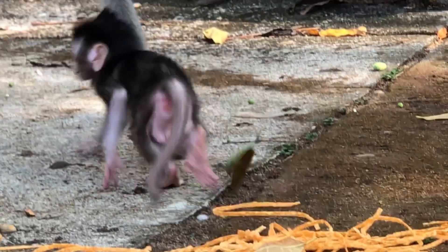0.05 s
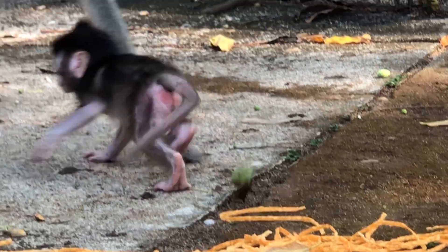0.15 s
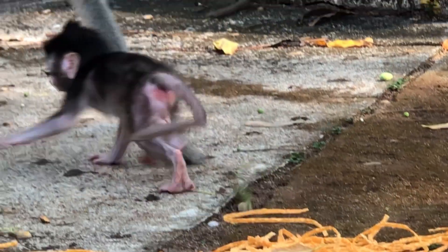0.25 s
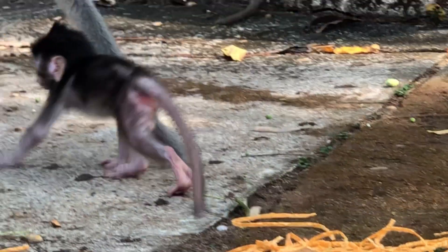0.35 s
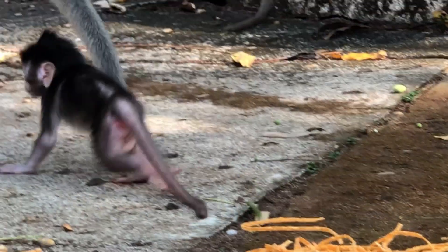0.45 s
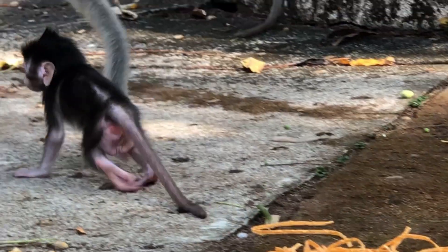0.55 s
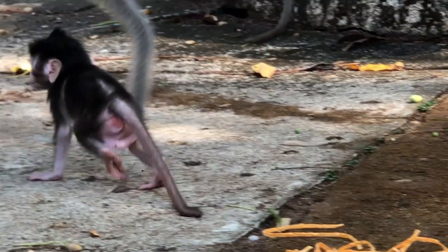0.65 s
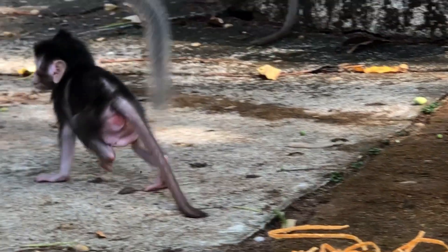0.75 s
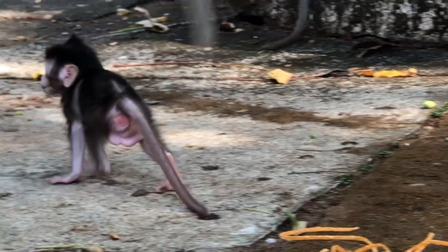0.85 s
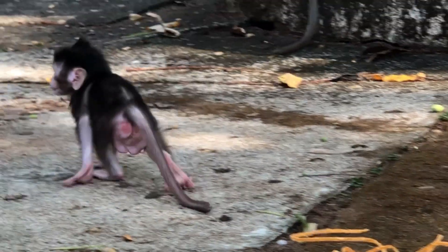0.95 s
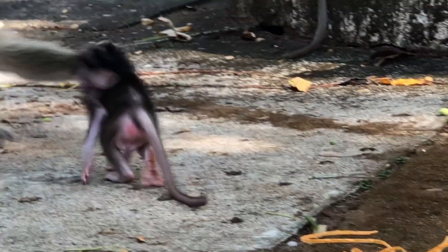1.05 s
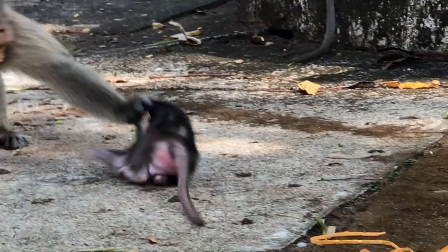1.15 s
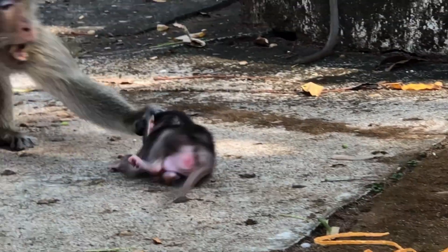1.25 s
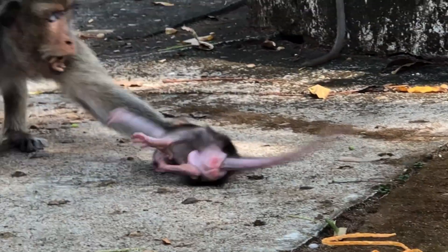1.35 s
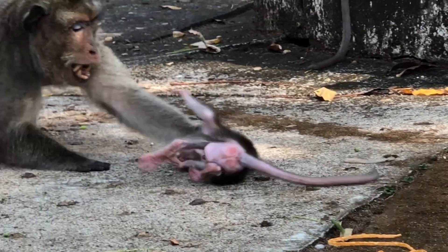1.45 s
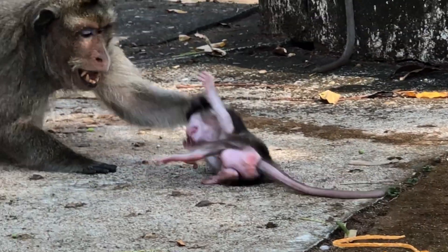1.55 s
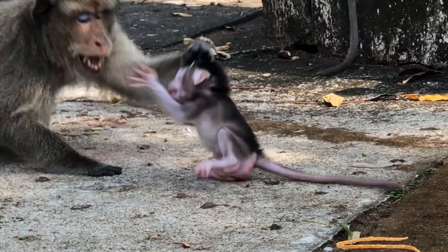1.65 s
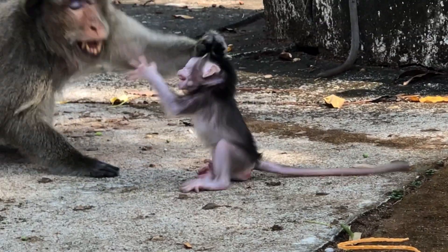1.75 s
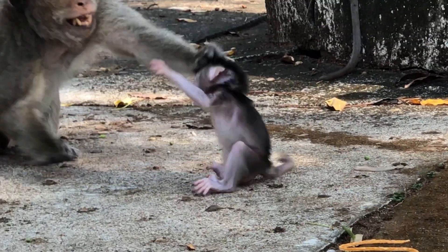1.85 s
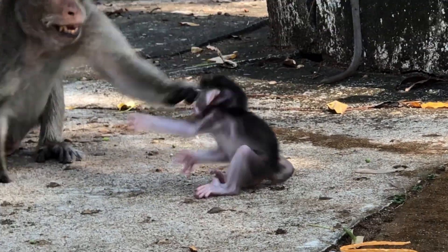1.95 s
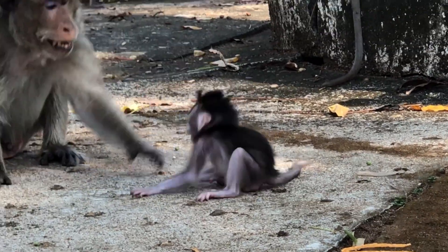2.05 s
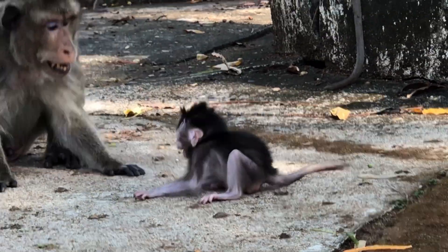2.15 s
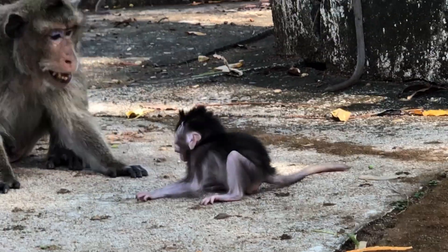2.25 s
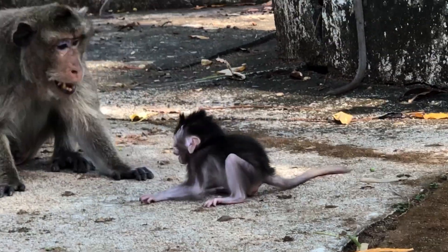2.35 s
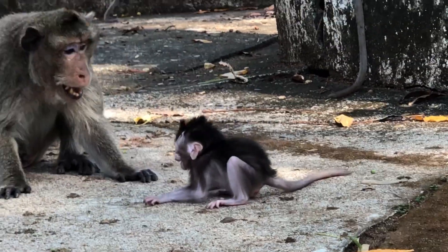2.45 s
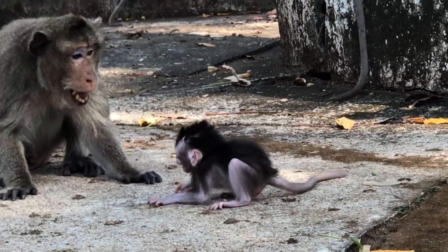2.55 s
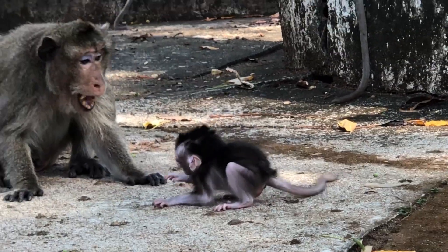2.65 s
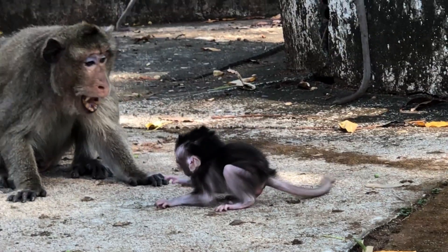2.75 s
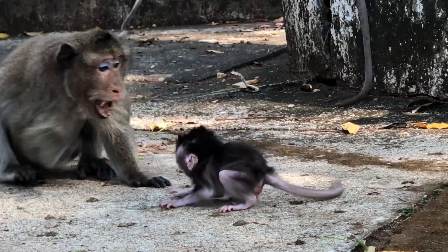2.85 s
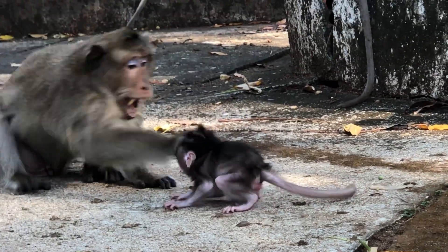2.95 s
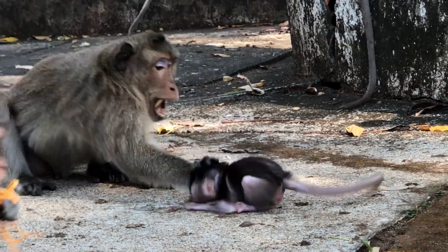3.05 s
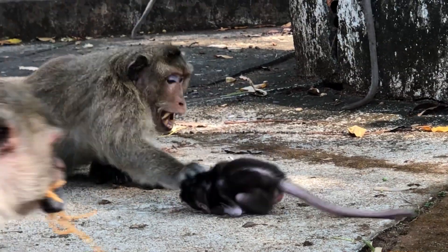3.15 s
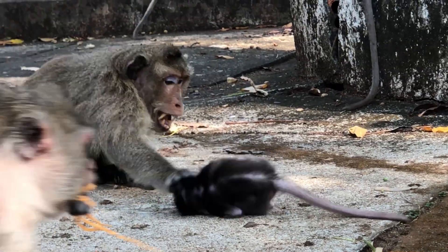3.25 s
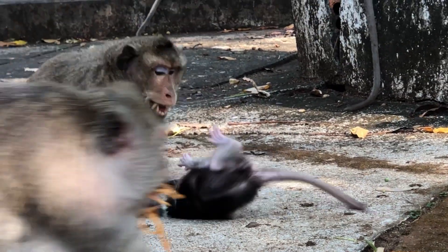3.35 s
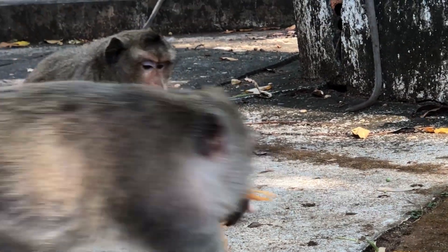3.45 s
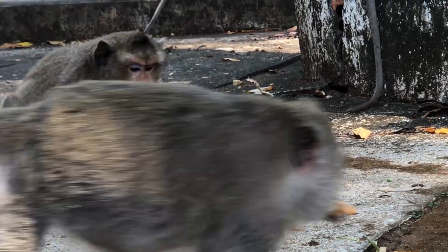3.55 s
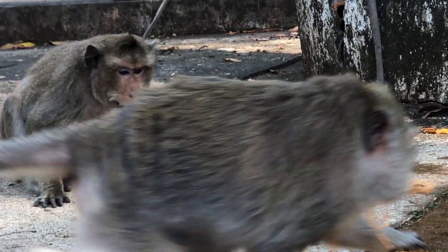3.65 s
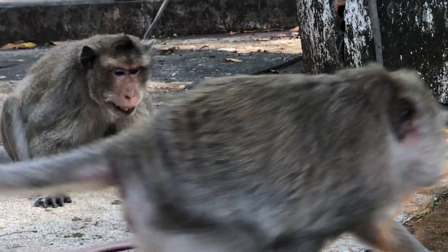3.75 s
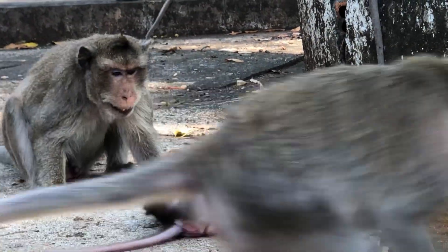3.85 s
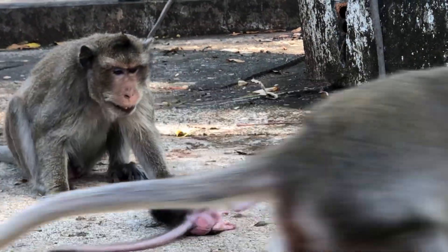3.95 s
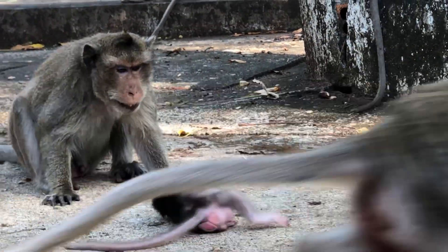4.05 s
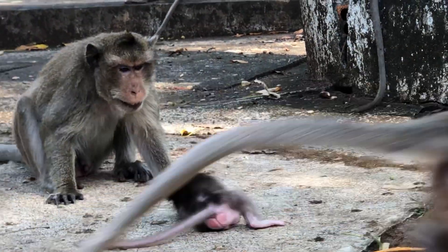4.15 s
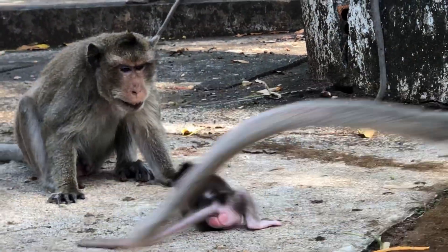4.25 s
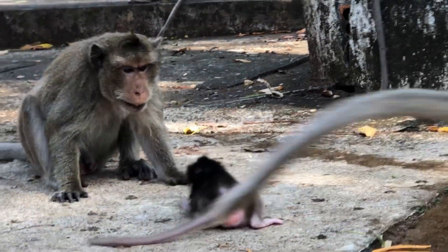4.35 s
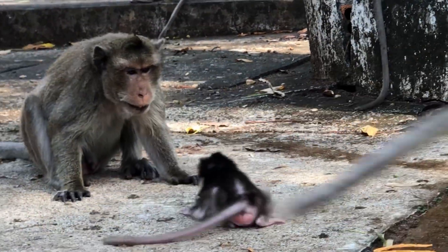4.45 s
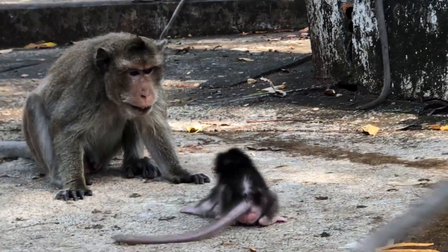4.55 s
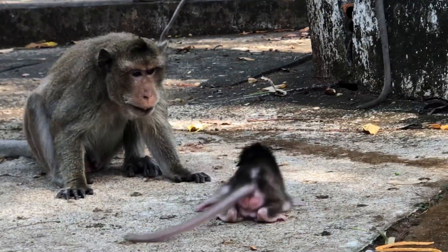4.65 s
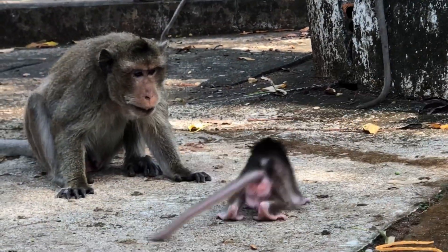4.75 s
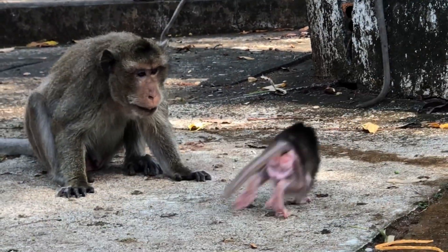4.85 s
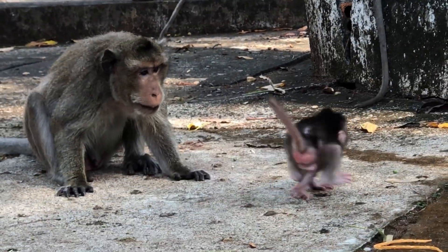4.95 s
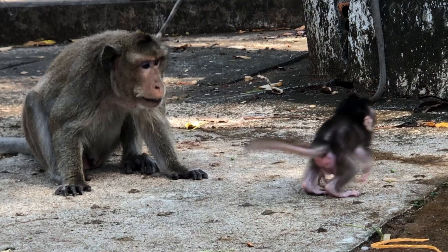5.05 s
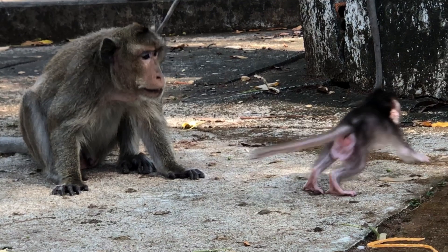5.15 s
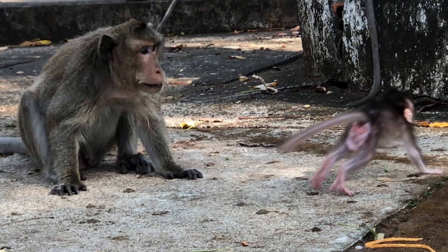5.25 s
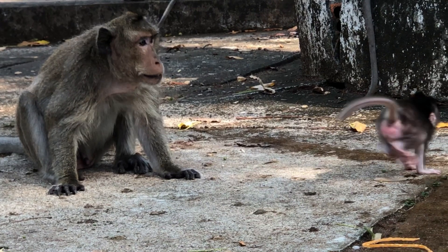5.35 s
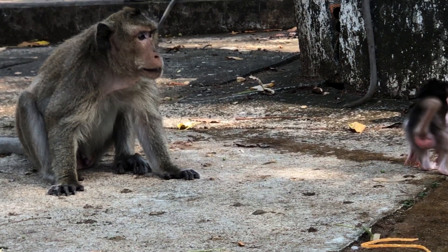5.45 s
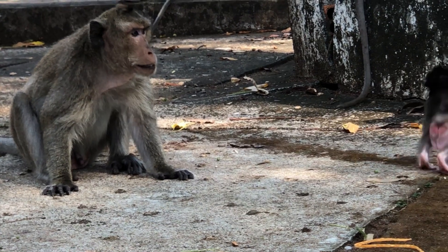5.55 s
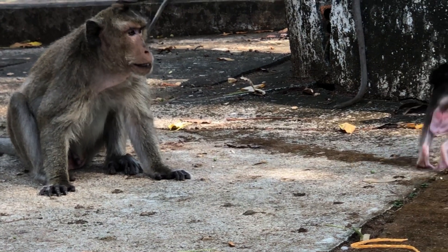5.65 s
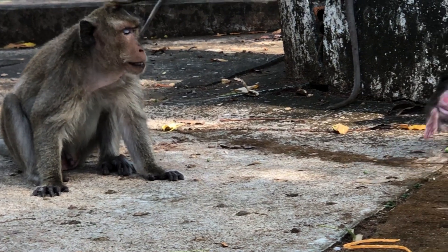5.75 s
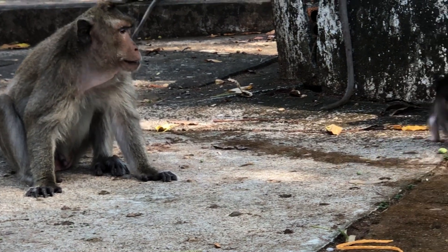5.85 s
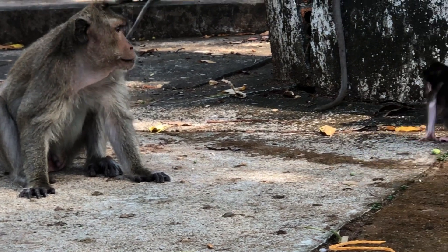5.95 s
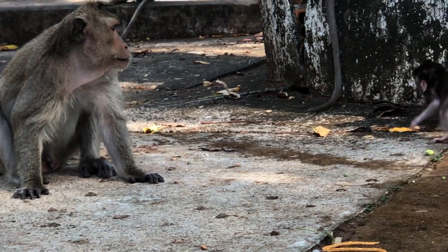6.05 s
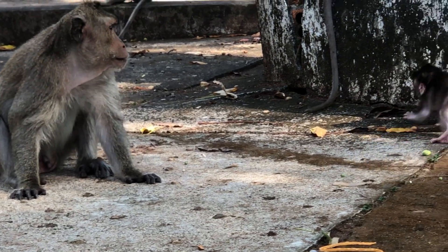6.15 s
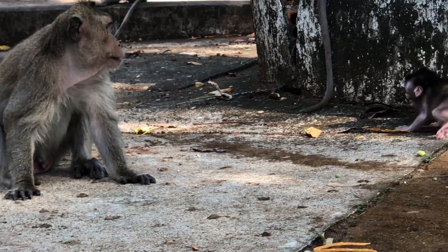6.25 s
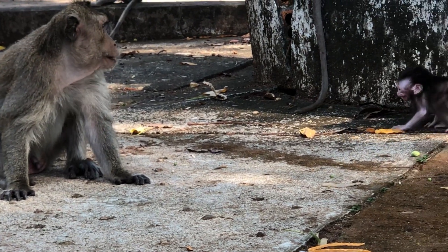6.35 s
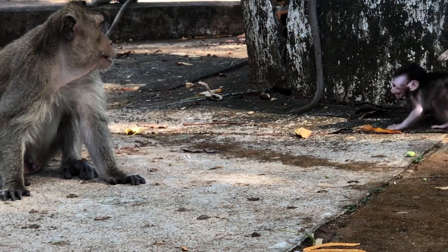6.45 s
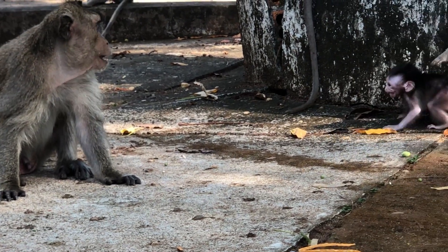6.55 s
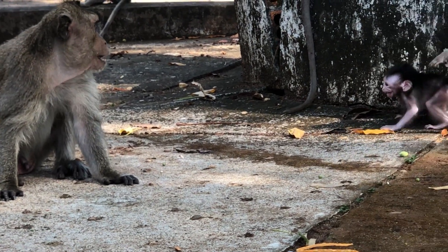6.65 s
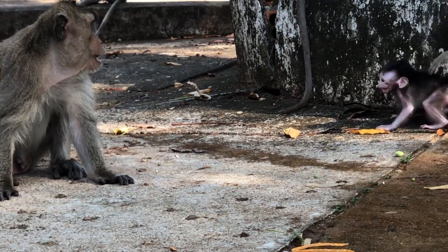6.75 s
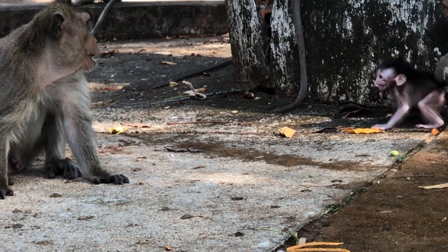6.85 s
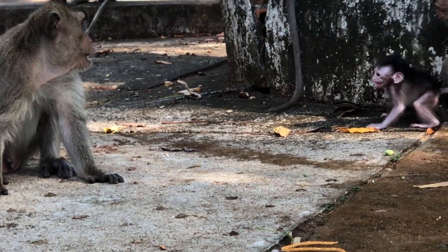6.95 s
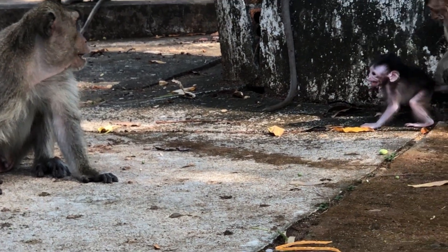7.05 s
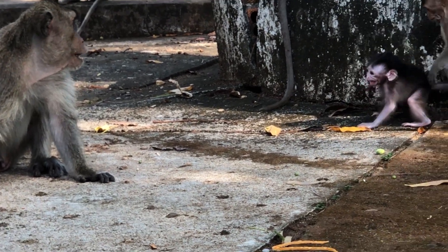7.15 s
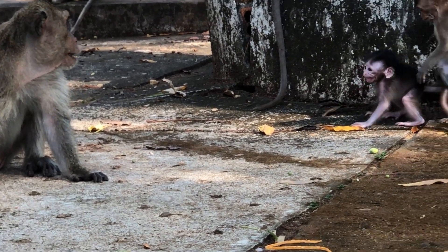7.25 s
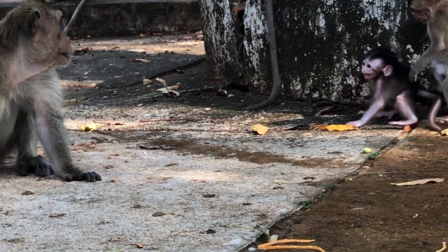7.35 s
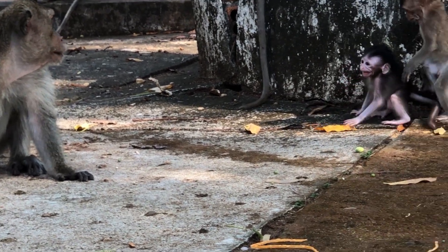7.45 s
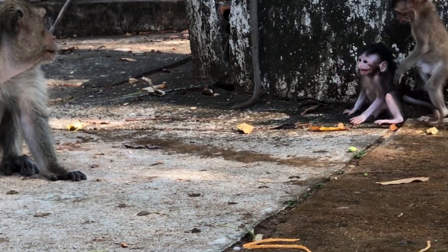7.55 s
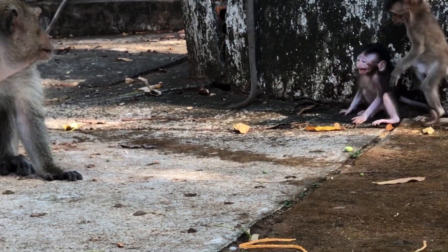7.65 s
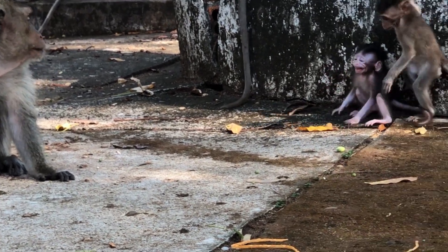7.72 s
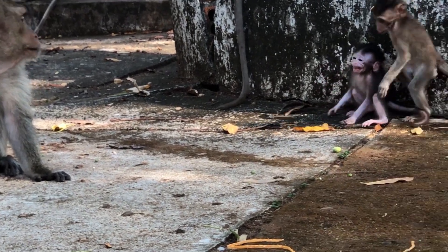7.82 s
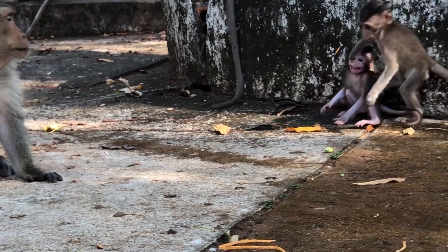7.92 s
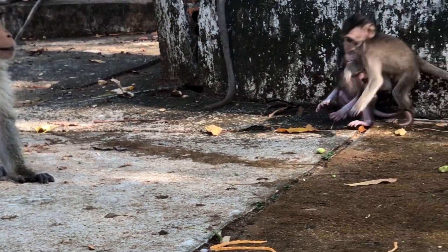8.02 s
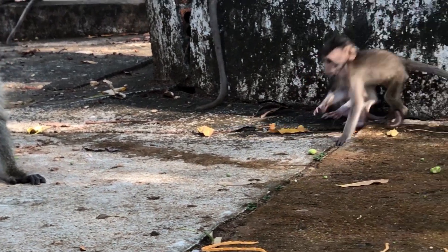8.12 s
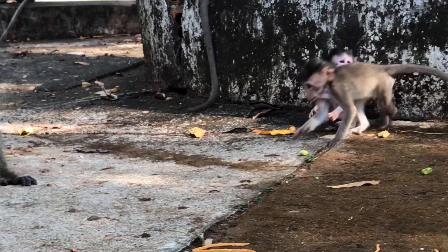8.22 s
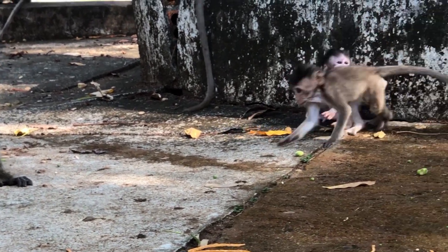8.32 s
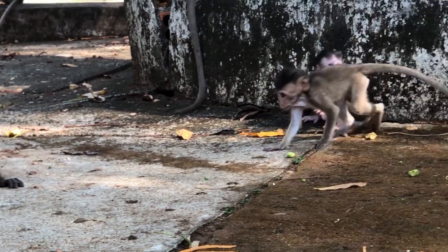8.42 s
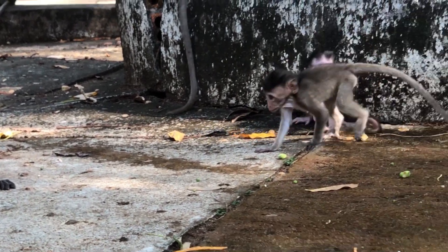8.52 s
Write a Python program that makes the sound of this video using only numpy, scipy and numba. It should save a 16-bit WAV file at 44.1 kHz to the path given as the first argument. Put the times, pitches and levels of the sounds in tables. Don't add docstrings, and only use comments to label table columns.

```python
import sys
import numpy as np
from scipy import signal
from scipy.fft import rfft, irfft, next_fast_len
from scipy.io import wavfile
from scipy.ndimage import uniform_filter1d
from numba import njit

SR = 44100
rng = np.random.default_rng(int(sys.argv[2]) if len(sys.argv) > 2 else 0)


def pcm_store(signal):
    levels = np.round(np.clip(np.atleast_2d(signal), -1, 1) * 32767)
    wavfile.write(sys.argv[1], SR, levels.astype(np.int16).T)


def amplitude_ratio(level_db):
    exponent = np.asarray(level_db, float) / 20
    return 10 ** exponent


N = 378378

# start, peak and end in seconds, peak level in dB, swell up to the peak in dB.
BREATHS = [(1.208, 1.245, 1.32, -54, 7), (1.259, 1.339, 1.4915, -13.5, 11), (1.773, 1.897, 1.979, -20.5, 5),
           (2.58, 2.628, 2.65, -36.5, 20), (3.107, 3.175, 3.374, -19, 6), (3.339, 3.413, 3.52, -25.5, 4),
           (3.832, 3.888, 4.032, -24.5, 9.5), (4.604, 4.75, 4.845, -23.5, 12.5),
           (5.182, 5.245, 5.274, -30, 11), (5.269, 5.325, 5.375, -34, 6), (5.622, 5.737, 5.8, -26.5, 6),
           (6.219, 6.373, 6.435, -27, 13.5), (7.755, 7.812, 7.928, -32.5, 20),
           (8.479, 8.564, 8.7, -25.5, 13)]
# sag after the peak in dB, resonance at the start and at the end in Hz,
# brightness in dB, chest in dB.
MOUTHS = [(1.5, 4300, 4400, -7.5, 25), (5.5, 5300, 3950, -1.5, 7), (3.4, 4330, 5560, 5, -8),
          (-7, 3900, 3890, 10.5, 7), (12, 4570, 7870, 3.5, -3), (4, 6300, 4500, -3.5, -8),
          (4, 5250, 3600, -15, -1), (11.5, 4200, 5740, 3, -0.5), (-16, 5140, 5700, 5, -18.5),
          (-0.5, 4300, 5900, -1, -12), (8, 5700, 5740, 5, -1.5), (3, 6750, 4800, 8, 0),
          (-2.3, 4150, 4700, 2.5, -8), (7, 4350, 5800, -5.5, -21)]
SWITCH_S = 0.009


def unit(x):
    return x / np.sqrt(np.mean(x ** 2))


def curve(table, hz):
    f, db = np.transpose(table)
    return np.interp(np.log(np.maximum(hz, 1)), np.log(f), db)


def colour(x, gain):
    size = next_fast_len(len(x))
    hz = np.arange(size // 2 + 1) * SR / size
    return irfft(rfft(x, size) * gain(hz), size)[:len(x)]


def slew(x, seconds):
    return uniform_filter1d(1. * x, size=max(int(seconds * SR), 1))


def walk(rate_hz):
    hold = max(int(SR / rate_hz), 1)
    steps = np.repeat(rng.standard_normal(N // hold + 1), hold)
    return unit(uniform_filter1d(uniform_filter1d(steps, hold), hold)[:N])


@njit
def moving_resonance(x, hz, width_hz):
    y, band, low = np.empty(len(x)), 0., 0.
    for i in range(len(x)):
        g, k = np.tan(np.pi * hz[i] / SR), width_hz / hz[i]
        v = (band + g * (x[i] - low)) / (1 + g * (g + k))
        band = 2 * v - band
        low += 2 * g * v
        y[i] = k * v
    return y


def infant():
    # frequency in Hz, gain in dB.
    throat = [(700, -36), (1100, -25.5), (1600, -20), (2000, -5.5), (2500, -3), (3100, -5), (5000, -0.5),
              (6500, -7.5), (8200, -11), (9200, -12.5), (10200, -18.5), (11000, -26.5)]
    t = np.arange(N) / SR
    start, _, end, peak_db, _ = np.transpose(BREATHS)
    i = np.clip(np.searchsorted(start, t) - 1, 0, None)
    _, from_hz, to_hz, bright_db, chest_db = np.array(MOUTHS)[i].T
    progress = np.clip((t - start[i]) / (end - start)[i], 0, 1)
    mouth_hz = from_hz + (to_hz - from_hz) * progress
    push = effort(t)
    below_peak_db = (20 * np.log10(push + 1e-6) - peak_db[i]).clip(-25, 0)
    bright_db = bright_db + 0.13 * below_peak_db

    raw = colour(folds(t), lambda f: amplitude_ratio(curve(throat, f)))
    mouth = moving_resonance(raw, slew(mouth_hz, SWITCH_S), 1500.0)
    high = colour(raw, lambda f: 1 / (1 + (6800 / (f + 1)) ** 8))
    chest = colour(raw, lambda f: 1 / (1 + (f / 2700) ** 8) / (1 + (1350 / (f + 1)) ** 8))
    voice = raw + amplitude_ratio(8.5) * mouth
    voice += (amplitude_ratio(slew(bright_db, SWITCH_S)) - 1) * high
    voice += (amplitude_ratio(slew(chest_db, SWITCH_S)) - 1) * chest
    voice /= np.sqrt(uniform_filter1d(voice ** 2, size=280))
    return voice * push


def effort(t):
    attack_s, release_s, release_power = 0.022, 0.037, 1.18
    out = 0
    for (start, peak, end, db, swell_db), (sag_db, *_) in zip(BREATHS, MOUTHS):
        opening = np.clip((t - start) / attack_s, 0, 1) ** 2
        closing = np.clip((end - t) / release_s, 0, 1) ** release_power
        level_db = np.interp(t, (start, peak, end), (db - swell_db, db, db - sag_db))
        out = np.maximum(out, opening * closing * amplitude_ratio(level_db))
    return out


def folds(t):
    overtone_db, under_db = -22.0, -18.0
    hz, n, depth, chaos = states(t)
    hz = hz * (1 + .025 * chaos ** 2 * walk(300) + .004 * walk(60))
    jitter = .85 * np.sqrt(chaos) * walk(2500)
    phase = (2 * np.pi * np.cumsum(hz) / SR + jitter) / n
    out = .6 * (.025 + chaos) * rng.standard_normal(N) * (1 + np.cos(phase))
    torn = np.clip(1.25 * chaos - .12, 0, 1)
    second_half = sum((t > (b[0] + b[2]) / 2) & (t < b[2]) for b in BREATHS)
    faint_db = -14 * slew(second_half, .04)
    for k in range(1, 14):
        pure_db = overtone_db * np.maximum(k / n - 2, 0) + faint_db * (k > n)
        share = np.where(k % n == 0, amplitude_ratio((1 - depth) * pure_db), depth)
        share = share * (k * hz / n < 12000)
        weakened = np.where(hz < 4700, abs(k * hz / n - 2000) < 520, k == 1)
        share *= amplitude_ratio(under_db * ((n > 3) + .5 * (n == 2)) * weakened)
        size = np.sqrt(1 - torn) + np.sqrt(torn) * walk(680)
        line = np.cos(k * phase + k * k * (k % n))
        out += share * size * amplitude_ratio(2.5 * walk(60)) * line
    return out


def states(t):
    # start in seconds, pitch from and to in Hz.
    whistles = [(1.224, 2854, 2947), (1.262, 3492, 4397), (1.484, 4402, 3585), (1.774, 4175, 4546),
                (1.957, 4638, 4008), (2.581, 3580, 3860), (2.605, 3880, 3925), (2.638, 3900, 3600),
                (3.836, 4150, 4114), (4.003, 4203, 4280), (4.6, 4075, 4255), (4.812, 4480, 4390),
                (5.188, 4350, 4270), (5.279, 4300, 4470), (5.347, 4420, 4350), (5.79, 4413, 4300),
                (6.218, 4240, 4400), (6.42, 4320, 4340), (7.758, 3750, 4300), (7.809, 4254, 4170),
                (7.86, 4135, 4120), (7.893, 4173, 4015), (8.477, 3890, 4260)]
    # start in seconds, pitch from and to in Hz, cycles per beat, depth 0-1.
    locked = [(1.281, 4572, 4690, 3, 0.8), (1.401, 5094, 5065, 4, 0.35), (1.435, 5040, 4740, 4, 0.32),
              (3.847, 4050, 4210, 4, 0.33), (3.864, 4190, 4175, 4, 0.74), (5.197, 4265, 4330, 4, 0.54),
              (6.236, 4280, 4300, 4, 0.85), (6.262, 4327, 4226, 4, 0.83), (6.378, 4267, 4136, 4, 0.72),
              (8.517, 4300, 4587, 4, 1)]
    # start in seconds, pitch from and to in Hz, cycles per beat, depth 0-1.
    hoarse = [(1.812, 4810, 4976, 3, 1), (3.311, 3995, 3880, 2, .95), (3.372, 3860, 3100, 2, 0.55),
              (3.94, 4134, 4006, 4, 0.47), (4.622, 4285, 4343, 4, 0.5), (5.256, 4264, 4190, 4, 0.4),
              (5.634, 4464, 4387, 4, 0.75), (5.758, 4148, 4030, 4, 0.6), (8.505, 4326, 4294, 4, .8)]
    # start in seconds, pitch in Hz, cycles per beat, depth 0-1, chaos 0-1.
    torn = [(1.302, 4580, 3, 0.52, 1.1), (1.344, 4150, 3, 0.25, 0.6), (1.357, 4336, 3, 0.2, 0.98),
            (1.474, 4710, 4, 0.66, 0.77), (1.79, 4855, 3, 0.3, 0.44), (1.833, 5330, 6, 1, 0.61),
            (1.89, 5443, 6, 0.29, 0.61), (1.94, 4896, 4, 0.6, 0.36), (3.108, 4150, 3, .4, .75),
            (3.135, 4600, 5, 1, 0.99), (3.39, 4494, 3, .8, .42), (3.44, 4256, 4, 0.89, .6),
            (3.889, 4234, 4, 0.9, 0.47), (3.984, 4083, 4, 0.51, 0.41), (4.645, 4360, 4, 1, .45),
            (4.735, 4318, 5, 0.7, 0.57), (4.775, 4246, 4, 0.99, .55), (5.223, 4370, 4, 0.98, 0.59),
            (5.31, 4473, 4, 0.57, 0.53), (5.657, 4510, 4, .97, .7), (5.705, 4320, 4, 0.96, .72),
            (6.403, 4073, 4, 1, .4), (8.53, 4530, 4, .97, .7)]
    whistle_depth, whistle_chaos, locked_chaos, hoarse_chaos = .03, .015, 0.013, .2
    torn_sag_hz_per_s = 2500

    rows = [(s, a, b, 1, whistle_depth, whistle_chaos) for s, a, b in whistles]
    rows += [(*row, locked_chaos) for row in locked]
    rows += [(*row, hoarse_chaos) for row in hoarse]
    rows += [(s, a, 0, n, d, c) for s, a, n, d, c in torn]
    start, from_hz, to_hz, cycles, depth, chaos = np.transpose(sorted(rows))
    stops = np.sort(np.concatenate([start, np.transpose(BREATHS)[2]]))
    length = stops[np.searchsorted(stops, start, side="right")] - start
    rise = np.where(to_hz > 0, to_hz - from_hz, -torn_sag_hz_per_s * length)
    i = np.clip(np.searchsorted(start, t) - 1, 0, None)
    hz = from_hz[i] + rise[i] * np.clip((t - start[i]) / length[i], 0, 1)
    depth = np.clip(slew(depth[i], SWITCH_S), 0, 1)
    chaos = np.clip(slew(chaos[i], SWITCH_S), 0, 1)
    return hz, np.round(cycles)[i], depth, chaos


def echoes(x):
    early_db, early_t60 = -17, 0.56
    late_db, late_t60 = -22, 1.22
    t = np.arange(SR * 3 // 2) / SR
    early = unit(rng.standard_normal(len(t)) * amplitude_ratio(-60 * t / early_t60) * (t > .004))

    def wall(f):
        warm = (amplitude_ratio(4) - 1 + 1) * np.exp(-np.log2((f + 1) / 3500) ** 2 / 0.031)
        return (1 + warm) / (1 + (f / 8000) ** 2)

    late = colour(rng.standard_normal(len(t)), wall)
    late = unit(late * amplitude_ratio(-60 * t / late_t60) * np.minimum(t / 0.012, 1))
    response = (amplitude_ratio(early_db) * early + amplitude_ratio(late_db) * late) / np.sqrt(len(t))
    return signal.fftconvolve(x, response)[:N]


def small_sounds():
    # start in seconds, peak in dB, pitch in Hz, spread in octaves.
    ticks = [(1.054, -39, 5470, 0.46), (1.258, -52, 7000, 0.42), (2.9712, -34.5, 5470, 0.59),
             (3.0294, -50.5, 7740, 0.8), (4.3794, -46.5, 5460, 0.72), (4.4193, -50, 5350, 0.71),
             (4.4415, -37.5, 5700, 0.51), (4.89, -36.5, 5770, 0.6), (5.0394, -38.5, 5276, 0.64),
             (7.0078, -45, 5365, 0.68), (7.1494, -53, 5470, 0.62), (7.9595, -52, 6690, 0.53)]
    # start in seconds, peak in dB, pitch in Hz, spread in octaves.
    thuds = [(1.057, -32, 2490, 0.54), (2.974, -35, 1570, 1.1), (4.021, -38, 1654, 0.9),
             (4.344, -34, 1017, 1.23), (4.52, -31.5, 1500, 1.5), (4.893, -38.5, 906, 0.84),
             (6.084, -40, 784.6, 0.99), (6.182, -37, 1544, 0.96), (6.869, -39, 1940, 0.93),
             (7.749, -43, 996, 0.81)]
    # start in seconds, length in seconds, pitch in Hz, level in dB.
    coos = [
        (0.336, 0.39, 332.6, -56.5),
        (0.35, 0.39, 4520, -68),
        (8.301, 0.31, 382, -60),
    ]
    lead = 128
    out, t = np.zeros(N), np.arange(1024) / SR
    decay = np.exp(-t / .0015) + .4 * np.exp(-t / 0.011)
    for start, db, hz, spread in [*ticks, *thuds]:
        burst = np.roll(rng.standard_normal(1024) * decay, lead)
        tick = colour(burst, lambda f: np.exp(-(np.log2((f + 1) / hz) / spread) ** 2))
        tick *= signal.windows.tukey(1024, .2)
        i = int(start * SR) - lead
        out[i:i + 1024] += tick / np.abs(tick).max() * amplitude_ratio(db - 3)
    t = np.arange(N) / SR
    for start, length, hz, db in coos:
        swell = np.sin(np.pi * np.clip((t - start) / length, 0, 1))
        phase = 2 * np.pi * np.cumsum(hz * (1 + 0.008 * walk(16))) / SR
        out += amplitude_ratio(db) * swell * np.sin(phase)
    return out


def insects():
    # pitch in Hz, width in Hz, level in dB.
    choruses = [
        (3100, 410, -63.5),
        (3750, 590, -63),
        (4740, 440, -67),
        (940, 100, -74),
    ]
    out = 0
    for hz, width, db in choruses:
        hiss = colour(rng.standard_normal(N), lambda f: np.exp(-((f - hz) / width) ** 2))
        out = out + unit(hiss) * amplitude_ratio(db + .8 * walk(1.2))
    return out


def yard():
    # frequency in Hz, level in dB per Hz.
    spectrum = [(12, -44), (20, 2), (75, 0), (130, -6), (233, -16.5), (337, -17.5), (405, -20.5),
                (587, -22.5), (919, -24), (1200, -28), (1600, -25.5), (2030, -29.5), (4480, -29),
                (9890, -54), (11000, -76.5), (14300, -101), (22000, -120)]
    out, swell = 0, walk(0.24)
    for hz in 22 * 2 ** np.arange(0, 9.1, .5):
        def band_gain(f):
            octaves = np.clip(np.log2((f + 1) / hz), -.5, .5)
            return amplitude_ratio(curve(spectrum, f)) * np.cos(np.pi * octaves)

        band = colour(rng.standard_normal(N), band_gain)
        out = out + band * amplitude_ratio(0.2 * swell + 0.37 * walk(1.422) + 0.89 * walk(15))
    return unit(out) * amplitude_ratio(-45)


def engine():
    # time in seconds, level in dB.
    idle = [(0, -50), (.9, -48.5), (1.6, -44), (2.2, -44), (2.9, -44.5), (3.599, -43), (4, -55), (5, -60.5),
            (8.58, -68)]
    s, db = np.transpose(idle)
    hz = 82 * (1 + 0.0289 * walk(1.5) + 0.0393 * walk(25))
    phase = 2 * np.pi * np.cumsum(hz) / SR
    hum = (np.sin(phase) + 0.19 * np.sin(2 * phase)) * amplitude_ratio(1.5 * walk(8.0))
    return hum * amplitude_ratio(np.interp(np.arange(N) / SR, s, db) - 1.5)


def scene():
    # time in seconds, level in dB.
    turning = [(1.3, -5.5), (1.9, 0), (2.6, -4.5), (3.3, 7), (3.901, 2.5), (4.7, 3), (5.3, 5.5), (5.7, 3),
               (6.3, 4), (7.799, -9), (8.5, 15.5)]
    cry, small = infant(), small_sounds()
    to_walls = cry * amplitude_ratio(np.interp(np.arange(N) / SR, *np.transpose(turning)))
    near = cry + small + echoes(to_walls + small)
    return (near + insects() + yard() + engine())[None]


def roll_off(x):
    return signal.sosfilt(signal.butter(12, 11140, fs=SR, output="sos"), x)


def record(dry):
    bass_cut = signal.butter(2, 30, "high", fs=SR, output="sos")
    return roll_off(signal.sosfilt(bass_cut, dry))


dry = scene()
out = record(dry)
pcm_store(out)
```